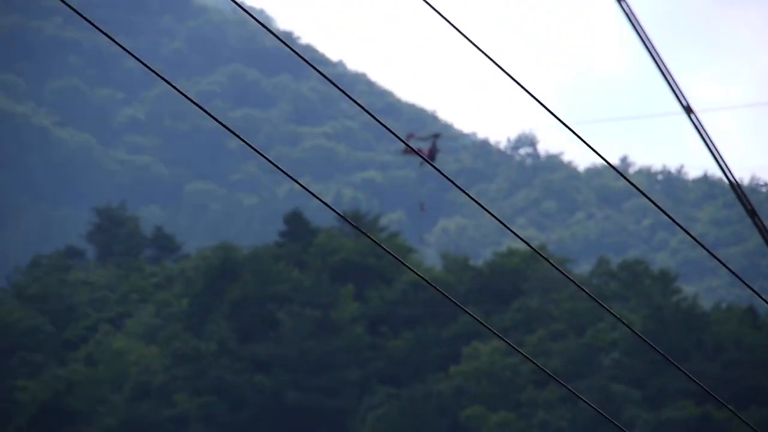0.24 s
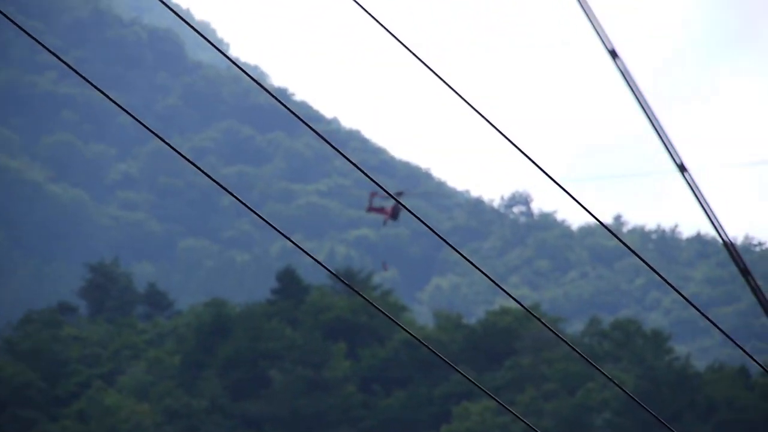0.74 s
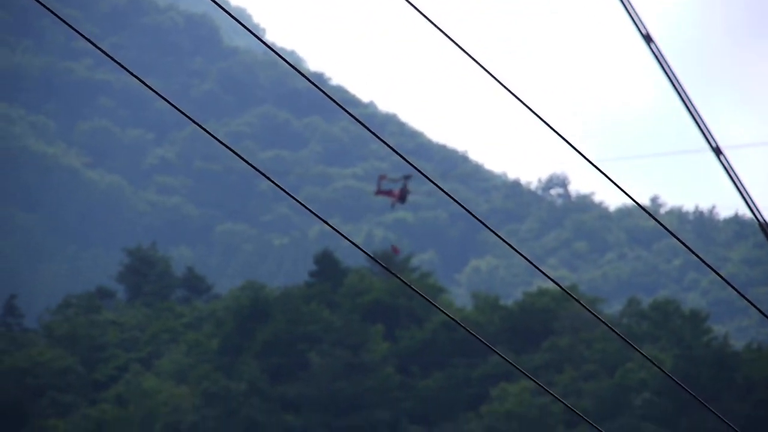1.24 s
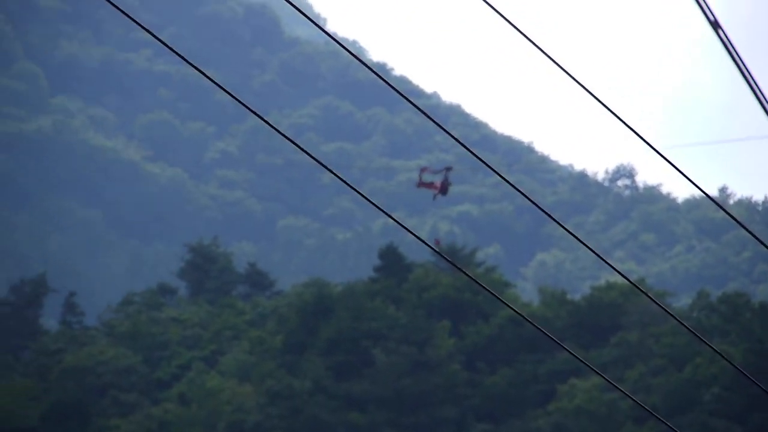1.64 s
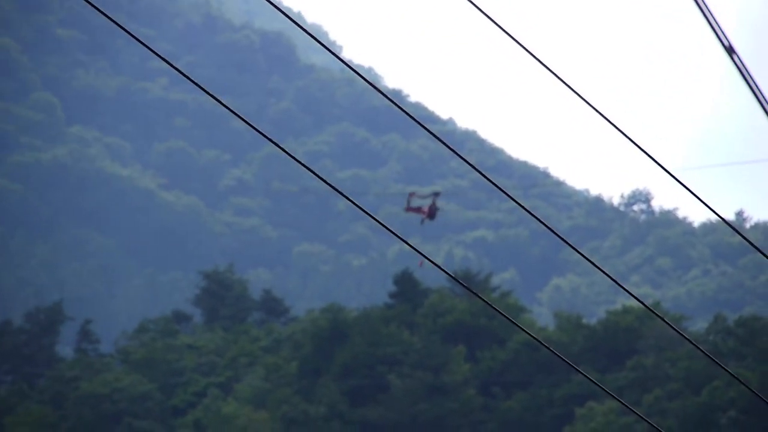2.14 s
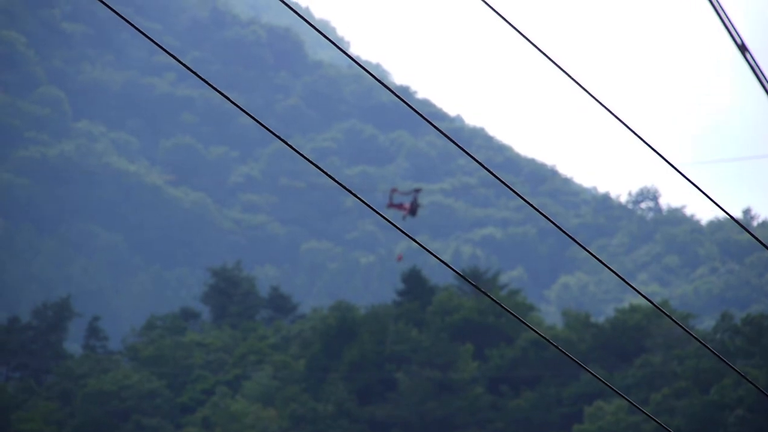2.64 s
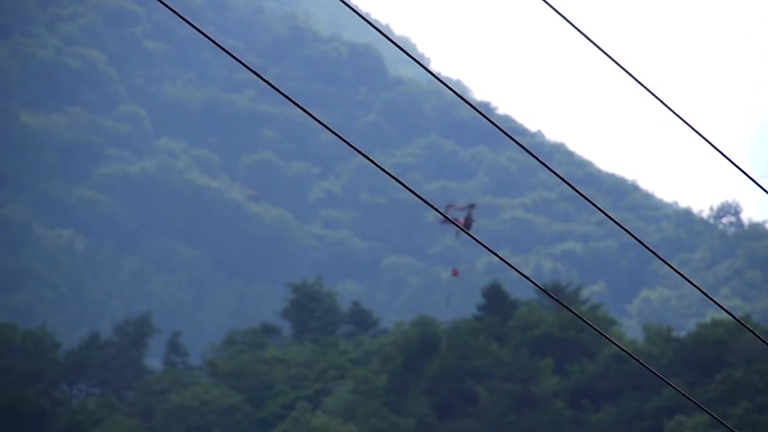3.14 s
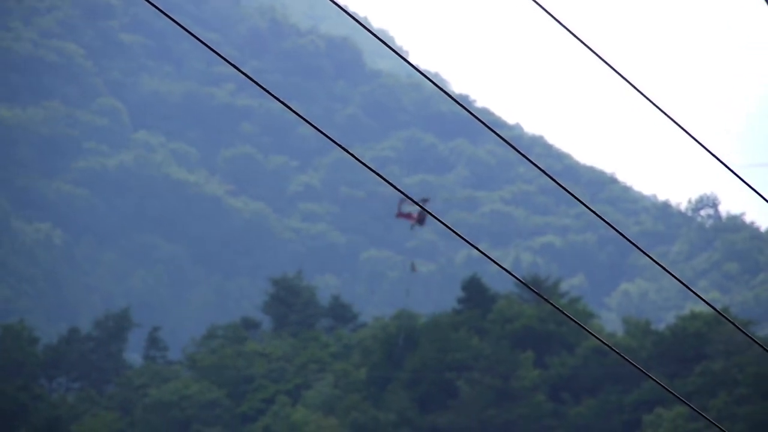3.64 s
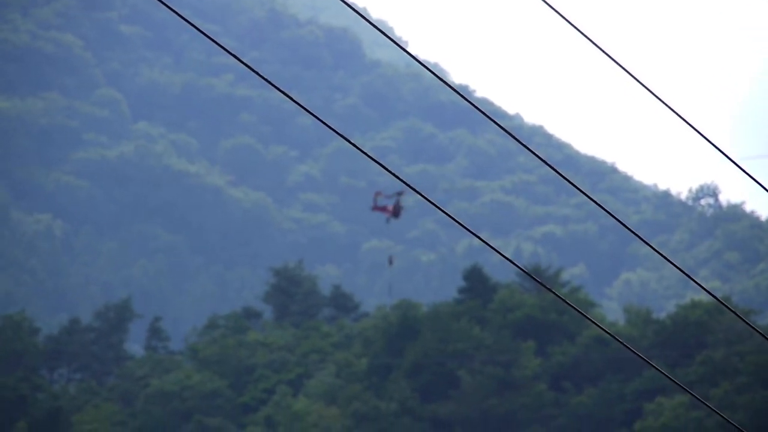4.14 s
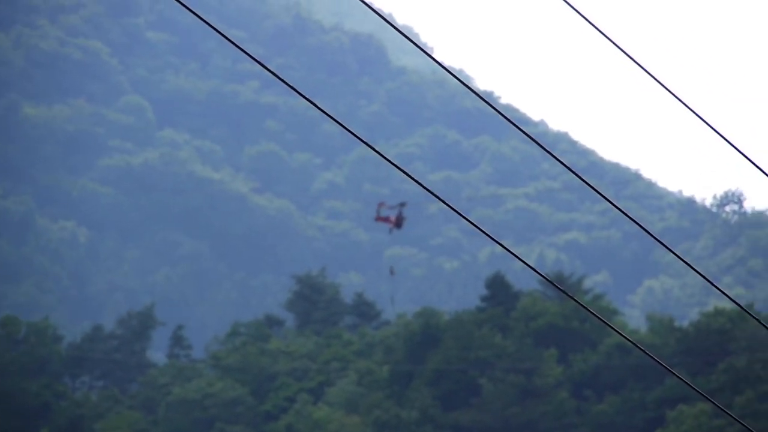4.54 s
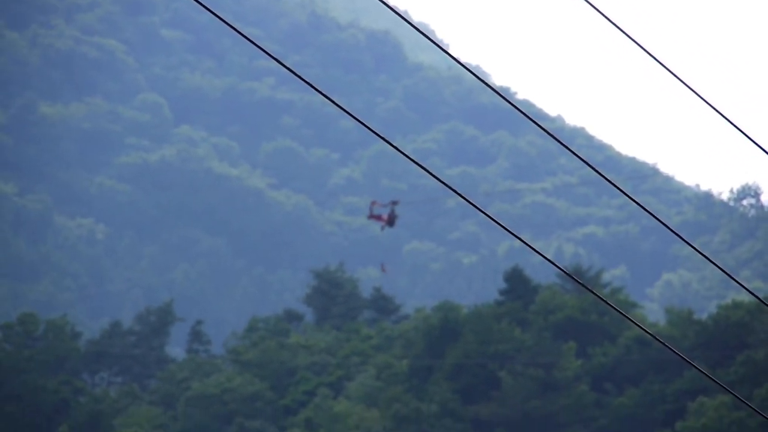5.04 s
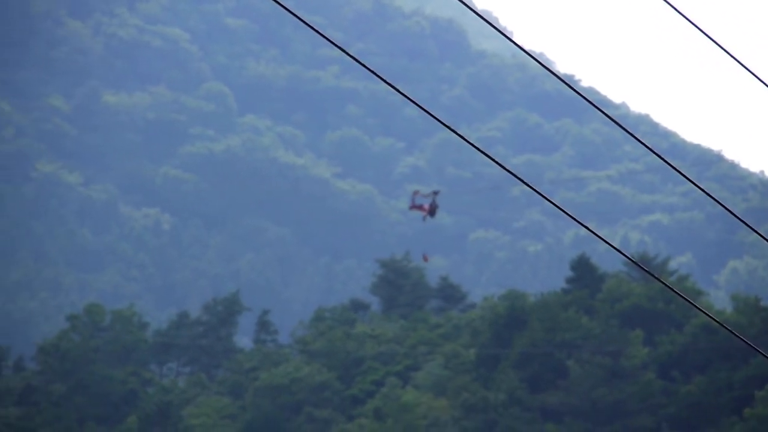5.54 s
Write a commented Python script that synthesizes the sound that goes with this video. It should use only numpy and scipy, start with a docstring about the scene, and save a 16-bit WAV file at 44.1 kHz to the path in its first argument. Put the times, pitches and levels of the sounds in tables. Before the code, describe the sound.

A diesel winch engine pulls a load continuously from 0 to about 5.8 seconds, without starting or stopping. Its firing makes a low, solid hum around 81 Hz, creeping up to about 84 Hz by 3.5 seconds, then wavering only slightly. As it rises, the octave above the hum strengthens, fullening the drone. Over it sits a rough, breathy roar of gas and fan noise, fluttering with the firings. A geared pump whines at about 800 Hz and its multiples, strongest near 2.5 kHz, swelling around 0.3 and 1.9 seconds and wavering later. Dense knocks and valve ticks chatter throughout; sharper, uneven tappet snaps near 5 kHz stand out around 0.4, 3.1 and 5.4 seconds. Faint loose-steel buzzes come occasionally. The outdoor sound is dry and close, bright on the right; the left shares the bass but has weaker, diffuse treble.

```python
"""A six-cylinder diesel winch engine runs under load outdoors, to the right: its exhaust hums three times a turn.
The block rings at other multiples of the crank speed. A geared pump whines at thirty teeth a turn,
with once-a-turn side tones beside its whine. Gas and fan noise puffs with each firing.
Knocks, valve ticks, one loose tappet and loose steel ring metal modes.
The right microphone faces the engine; the left hears similar bass but weak, partly inverted treble."""
import sys
import numpy as np
from scipy import signal
from scipy.fft import rfft, irfft
from scipy.io import wavfile
from scipy.ndimage import uniform_filter1d

SR = 44100
rng = np.random.default_rng(int(sys.argv[2]) if len(sys.argv) > 2 else 0)


def invert_db(x):
    """Field ratio 10**(x/20) for x, a level in decibels (scalar or array-like)."""
    u = np.asarray(x, float) / 20
    return 10 ** u


def generate_wav(signal):
    """Clip the signal to [-1, 1] and save it as 16-bit WAV at the path in sys.argv[1]."""
    frames = np.transpose(np.atleast_2d(signal))
    scaled = np.clip(frames, -1, 1) * 32767
    pcm = np.round(scaled).astype(np.int16)
    wavfile.write(sys.argv[1], SR, pcm)


N = 255780  # length in samples
FREQ = np.fft.rfftfreq(N, 1 / SR)  # every frequency of the whole sound, in Hz

PUMP_TEETH = 30  # teeth passing per crank turn
START_TURN = 0.248  # crank angle at the start, in turns
ROAR_DB = -25.5  # overall level of the direct gas and fan noise
# ordinary tappet snaps: crank angle (turns), middle level (dB), scatter (dB)
SNAP_TURN, SNAP_DB, SNAP_SPREAD_DB = 0.61, -31, 3.0

# Crank speed climbs, then hunts a little round its working point: time_s, speed_turns_per_s
CRANK_SPEED = [(0, 27.075), (2.05, 27.551), (2.25, 27.642), (2.55, 27.668), (2.8, 27.753), (3.15, 27.719),
               (3.35, 27.877), (3.55, 27.9), (3.7, 27.818), (4.0, 27.943), (4.2, 27.919), (4.4, 27.848),
               (4.7, 27.981), (5.0, 27.894), (5.35, 27.983), (5.8, 27.985)]
# Exhaust tones that change with speed: multiple_of_firing_rate, slow_level_db, fast_level_db,
# change_from_turns_per_s, change_to_turns_per_s, waver_db
EXHAUST_TONES = [(1, -21.7, -21.2, 27.2, 27.7, .3), (2, -37, -27.8, 27.35, 27.82, .45),
                 (3, -40, -48, 27.28, 27.56, .71)]
# Ringing of the block, and once-a-turn side tones beside the pump whine:
# multiple_of_crank_speed, level_db
CRANK_TONES = [(2, -59.5), (4, -42), (5, -54.5), (7, -47), (11, -51.5), (12, -40.5), (13, -46), (14, -44),
               (15, -48.5), (16, -44.5), (17, -46), (18, -39.3), (19, -49.5), (20, -58), (21, -44),
               (24, -47), (28, -60.5), (29, -48.5), (31, -40), (32, -48.5), (33, -43.5), (34, -45),
               (35, -43.5), (38, -47.5), (39, -48.5), (56, -50), (58, -53.5), (61, -53), (63, -50),
               (89, -51.5), (91, -55.5)]
# Pump tones that change with speed: multiple_of_tooth_rate, slow_level_db, fast_level_db,
# change_from_turns_per_s, change_to_turns_per_s, waver_db
PUMP_TONES = [(1, -40, -33.5, 27.6, 27.93, 1.8), (2, -38, -39.5, 27.3, 27.9, 2.4),
              (4, -43, -58, 27.3, 27.53, 1.6)]
# The pump's third multiple, the whine that carries: time_s, level_db
WHINE_LEVEL = [(0, -39), (.32, -31.5), (1.1, -34), (1.7, -39), (1.9, -30), (2.35, -32), (2.6, -36),
               (2.95, -33.5), (3.4, -36), (4.2, -32.5), (4.55, -36), (4.85, -33), (5.4, -36), (5.6, -32.5),
               (5.8, -34)]
# Colour of the gas and fan noise, before its overall level is set: pitch_hz, relative_level_db
ROAR_COLOUR = [(18, -47), (40, -33), (62, -26), (85, -17.5), (130, -16.5), (218, -19.5), (490, -14.5),
               (725, -20.5), (860, -17), (1240, -21.5), (2200, -21.5), (3500, -26), (5900, -32),
               (8000, -41), (9700, -49.5), (10300, -63), (11000, -100)]
# Casing resonances that shape this noise: pitch_hz, width_hz, boost_db
CASING_MODES = [(406, 180, 3), (929, 250, 4.5), (1456, 900, 5.5), (2600, 670, 3.5), (3490, 78, -1),
                (4030, 230, 1.5), (4430, 120, 3), (5100, 500, 4.5), (6515, 150, 5.5), (7300, 780, 5.5),
                (8660, 210, 6.5)]
# How far a firing of full, average strength lifts the noise: pitch_hz, lift_db
PUFF_DEPTH = [(200, 0), (700, 2.5), (2000, 1.5), (4500, 4), (9000, 5)]
# Combustion knock and valve gear: pitch_hz, width_hz, level_db, ticks_per_turn, crank_angle_turns, scatter_db
KNOCK_MODES = [(443, 237, -39, 1, .97, 5.5), (480, 157, -44.5, 3, 0.98, 2), (902, 230, -39, 3, 0.0049, 4.1),
               (1533, 350, -44, 3, 0.0056, 8), (4030, 300, -45.5, 3, 0.0036, 7),
               (5340, 760, -56, 3, 0.0045, 2), (7050, 760, -55.5, 3, .005, 9)]
# Loudest tappet snaps: start_s, blow_level_db
LOUD_SNAPS = [(0.05, -24.5), (0.235, -23.5), (0.383, -21), (0.529, -23), (0.603, -24), (1.043, -24.5),
              (1.079, -23), (1.299, -24), (1.918, -24.5), (2.027, -24), (2.172, -24.5), (2.317, -24),
              (2.823, -24), (3.075, -22.5), (3.291, -26), (3.865, -25), (4.259, -25.5), (4.295, -24),
              (4.511, -25), (5.369, -22), (5.441, -22), (5.476, -25), (5.548, -22)]
# Ring of the tappet: pitch_hz, width_hz, level_relative_to_blow_db
TAPPET_MODES = [(4890, 360, -2.5), (5100, 330, -2.5)]
# Clanks of loose steel: start_s, blow_level_db
STEEL_CLANKS = [(.075, -47), (.32, -48), (1.89, -49), (2.501, -51.5), (3.7, -51.5), (4.14, -51),
                (4.685, -48.5), (5.14, -52), (5.481, -48)]
# Ring of the loose steel: pitch_hz, width_hz, level_relative_to_blow_db
STEEL_MODES = [(860, 93, -3.5), (1060, 80, -6), (1484, 110, -2.5), (1810, 80, -6), (2010, 84, -4.5)]
# Shaded left microphone: pitch_hz, signed_share_of_right_sound (plain factor), lead_rad,
# scattered_noise_gain_db
LEFT_PATH = [(60, 1.07, 0.14, -25), (300, 1.05, 0.16, -14), (910, .85, 0.45, -21.5),
             (1510, 0.68, 0.49, -26), (2180, 0.13, 0.44, -8.5), (3000, 0.22, 0, -14),
             (3800, -0.15, 0.02, -6), (4520, -0.071, 0, -10), (4800, -0.27, 0, -7.5), (5330, -0.2, 0, -8.5),
             (6300, -0.2, 0, -10.5), (8100, -0.16, 0.036, -12), (10000, -0.0043, 0, -4)]


def over_hz(table, column=1):
    """Reads a table column at every frequency, joining its points along a log pitch axis."""
    rows = np.array(table, float)
    return np.interp(np.log(FREQ + 1), np.log(rows[:, 0]), rows[:, column])


def over_time(table):
    """Reads a table of time and value at every sample, joining its points with straight lines."""
    time_s, value = np.transpose(table)
    return np.interp(np.arange(N) / SR, time_s, value)


def by_speed(speed, slow_db, fast_db, low, high):
    """Moves a level from one value to another as the smoothed crank speed crosses a range."""
    smooth_speed = uniform_filter1d(speed, size=SR // 3)
    return np.interp(smooth_speed, [low, high], [slow_db, fast_db])


def walk(rate):
    """A random wander with a spread near 1: levels drawn `rate` times a second, smoothed twice."""
    hold = int(SR / rate)
    held = np.repeat(rng.standard_normal(N // hold + 3), hold)
    smooth = uniform_filter1d(uniform_filter1d(held, hold), hold)
    return 1.24 * smooth[hold:hold + N]


def tone(turns, db):
    """A sine of the given rms level, with its troughs on whole turns of its phase."""
    return -np.sqrt(2) * invert_db(db) * np.cos(2 * np.pi * turns)


def peak(hz, width):
    """The strength of one resonance at every frequency, 1 at its centre."""
    return 1 / np.sqrt(1 + (2 * (FREQ - hz) / width) ** 2)


def struck(hits, hz, width):
    """A struck metal mode that rises softly and rings out: one resonance applied twice."""
    pole = np.exp((2j * np.pi * hz - np.pi * width) / SR)
    return signal.lfilter([np.e * (1 - abs(pole))], np.poly([pole, pole]), hits).imag


def crossings(turns):
    """Finds the samples just before the phase passes a whole turn."""
    return np.flatnonzero(np.diff(np.floor(turns)))


def gas_and_fan(turn):
    """Noise bands half an octave apart puff with uneven firings, along a direct and a scattered path."""
    firing = 3 * turn + 0.927
    count = firing.astype(int) + 1
    strength = 1 + 0.33 * rng.standard_normal(count[-1] + 1)[count]
    puff = uniform_filter1d(strength * np.cos(np.pi * firing) ** 4, size=60)
    puff = puff * np.array([[1], [0.4]])  # the scattered path smears the puffs

    casing_db = sum(db * peak(hz, width) ** 2 for hz, width, db in CASING_MODES)
    colour = invert_db(over_hz(ROAR_COLOUR) + casing_db)
    spectra = rfft(rng.standard_normal((2, N))) * colour  # two unrelated noises
    depth = over_hz(PUFF_DEPTH)
    swell = walk(2.95)  # shared by all bands
    out = 0
    for hz in 30 * 2 ** np.arange(0, 9, 0.5):
        octaves_away = np.clip(np.log2(FREQ / hz + 1e-9), -0.5, 0.5)
        window = np.cos(np.pi * octaves_away) ** 2
        band = irfft(spectra * window, N)
        depth_db = depth[min(int(hz * N / SR), len(FREQ) - 1)]
        waver_db = 0.27 * swell + 0.6 * walk(12) + 0.68 * walk(30)
        out = out + band * invert_db(depth_db * puff + waver_db)
    return out * invert_db(ROAR_DB) / np.sqrt(np.mean(out[0] ** 2))


def loose_steel():
    """Loose steel clanks now and then: a fading rattle of noise makes its modes buzz for a moment."""
    time_s = np.arange(1500) / SR
    rattle = np.exp(-time_s / 0.013)
    out = np.zeros(N)
    for hz, width, mode_db in STEEL_MODES:
        hits = np.zeros(N)
        for start_s, blow_db in STEEL_CLANKS:
            at = int(start_s * SR)
            # mostly rough noise, with a little of the mode's own pitch
            rough = rng.standard_normal(len(rattle)) + 0.1 * np.cos(2 * np.pi * hz * time_s)
            hits[at:at + len(rattle)] = rattle * rough * invert_db(blow_db + mode_db)
        out += struck(hits, hz, width)
    return out


def tappet(turn):
    """One loose tappet snaps once a turn with uneven force; listed loud snaps replace the nearest ones."""
    at = crossings(turn - SNAP_TURN)
    force = np.clip(rng.standard_normal(len(at)), -3, 1.5)
    hits = np.zeros(N)
    hits[at] = invert_db(SNAP_DB + SNAP_SPREAD_DB * force)
    for start_s, blow_db in LOUD_SNAPS:
        hits[at[np.argmin(abs(at - start_s * SR))]] = 0
        hits[int(start_s * SR)] = invert_db(blow_db)
    return sum(invert_db(db) * struck(hits, hz, width) for hz, width, db in TAPPET_MODES)


def valves(turn):
    """Knocks and valve ticks at fixed crank angles ring short metal modes, each blow with its own force."""
    out = np.zeros(N)
    for hz, width, db, per_turn, angle, spread_db in KNOCK_MODES:
        at = crossings(per_turn * (turn - angle))
        force = np.clip(rng.standard_normal(len(at)), -3, 1.6) + 0.21 * walk(2)[at]
        hits = np.zeros(N)
        hits[at] = invert_db(spread_db * force)
        ring = struck(hits, hz, width)
        out += ring * invert_db(db) / np.sqrt(np.mean(ring ** 2))
    return out


def pump(turn, speed):
    """Gear teeth locked to the crank whine; the gear runs slightly out of true and its mesh flutters."""
    out_of_true = 0.015 * np.sin(2 * np.pi * turn)
    flutter = 0.02 * walk(15) + 0.012 * walk(70)
    teeth = PUMP_TEETH * turn + out_of_true + flutter
    levels = [(3, over_time(WHINE_LEVEL))]
    for multiple, *law, waver_db in PUMP_TONES:
        levels.append((multiple, by_speed(speed, *law) + waver_db * walk(5)))
    return sum(tone(multiple * teeth + 0.05 * walk(50), db + 1.3 * walk(18)) for multiple, db in levels)


def block_and_side_tones(turn):
    """Block ringing and the pump's side tones: multiples of the crank speed, each wavering alone."""
    out = np.zeros(N)
    for multiple, db in CRANK_TONES:
        looseness = 0.22 * rng.standard_normal() + 0.115 * walk(6)  # in turns of the tone
        waver_db = 1.5 * walk(5) + 1.73 * walk(20)
        out += tone(multiple * turn + looseness, db + waver_db)
    return out


def exhaust(turn, speed):
    """Three firings a turn hum with their next two multiples; the pipe favours the octave at speed."""
    out = np.zeros(N)
    for multiple, *law, waver_db in EXHAUST_TONES:
        level_db = by_speed(speed, *law) + waver_db * walk(14)
        out += tone(3 * multiple * turn, level_db)
    return out


def scene():
    """The right microphone faces the engine; the left gets a filtered share of it plus scattered noise."""
    speed = over_time(CRANK_SPEED)
    turn = START_TURN + np.cumsum(speed) / SR  # crank angle, in turns
    direct, scattered = gas_and_fan(turn)
    right = direct + loose_steel() + tappet(turn) + valves(turn)
    right = right + pump(turn, speed) + block_and_side_tones(turn) + exhaust(turn, speed)

    share = over_hz(LEFT_PATH) * np.exp(1j * over_hz(LEFT_PATH, column=2))
    scatter_gain = invert_db(over_hz(LEFT_PATH, column=3))
    left = irfft(rfft(right) * share + rfft(scattered) * scatter_gain, N)
    return np.array([left, right])


def top_cut(x):
    """Nothing passes above the cut-off."""
    return signal.sosfilt(signal.butter(12, 10390, fs=SR, output="sos"), x)


def record(dry):
    """Passes on the finished two-channel mix."""
    return top_cut(dry)


dry = scene()
out = record(dry)
generate_wav(out)
```